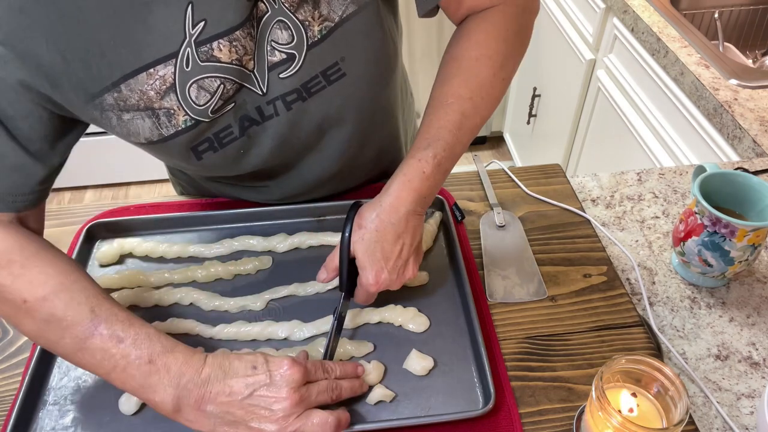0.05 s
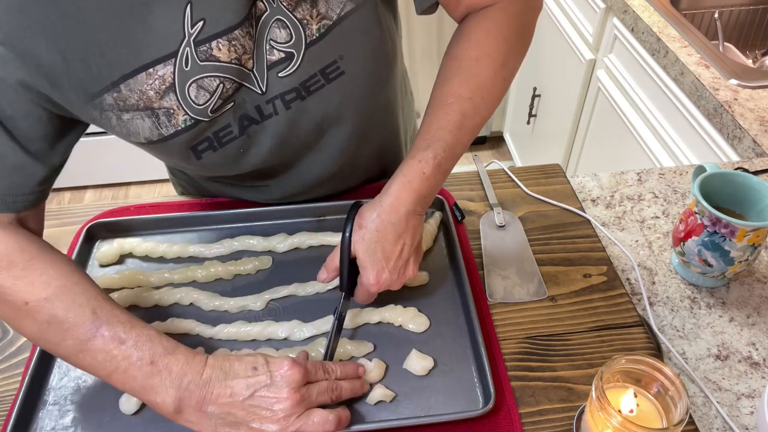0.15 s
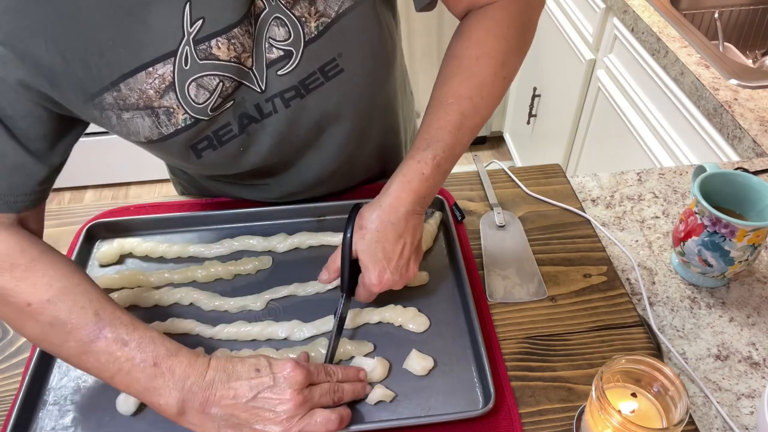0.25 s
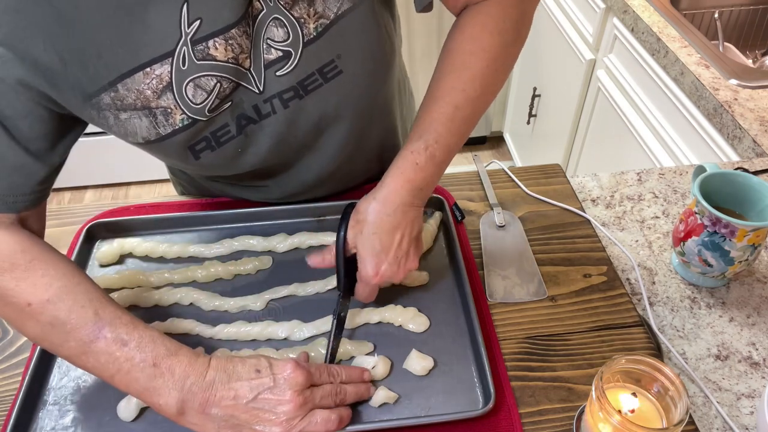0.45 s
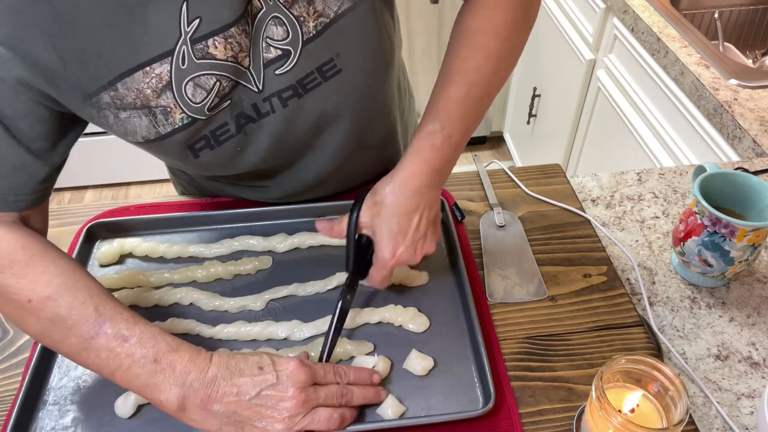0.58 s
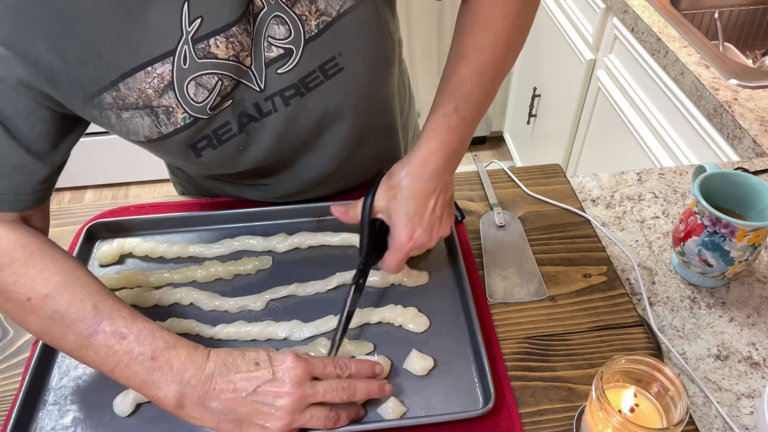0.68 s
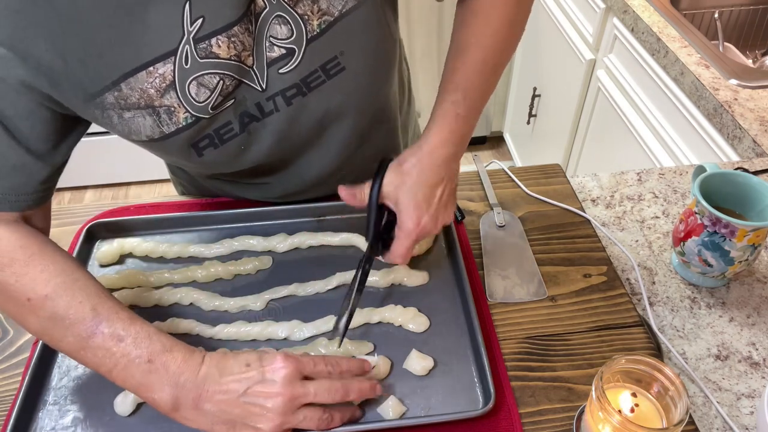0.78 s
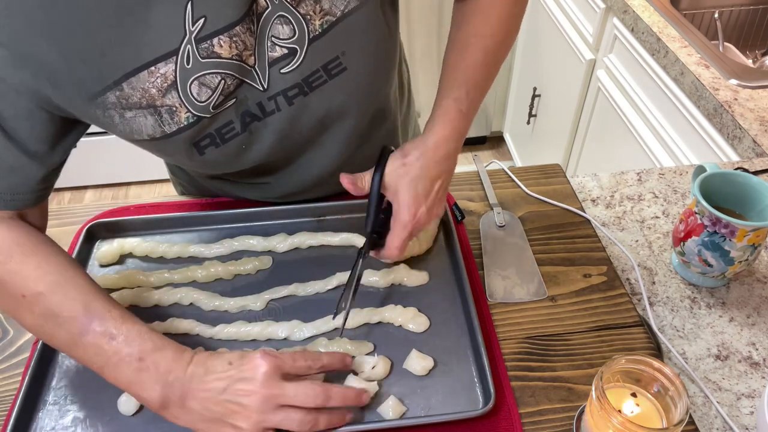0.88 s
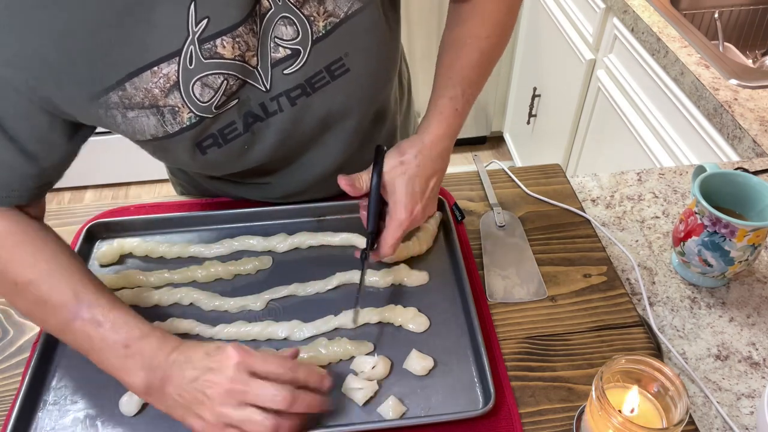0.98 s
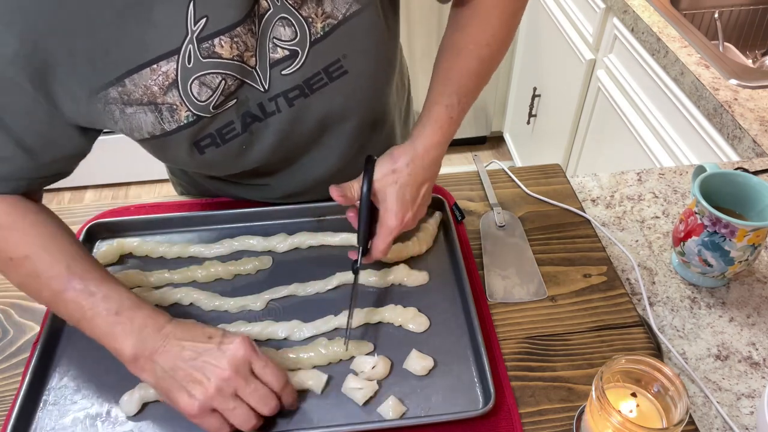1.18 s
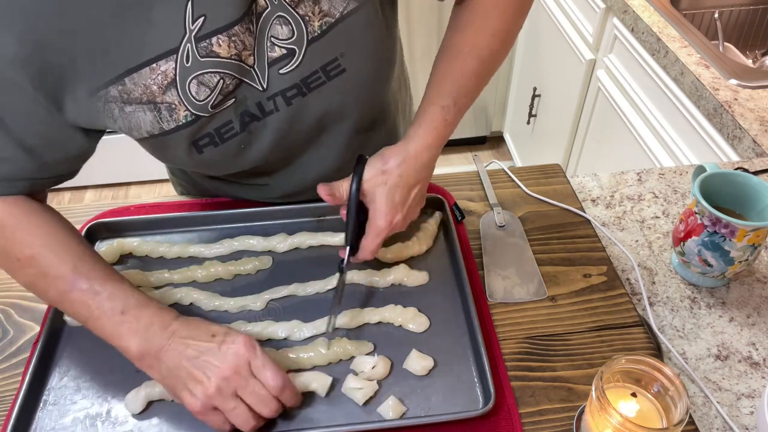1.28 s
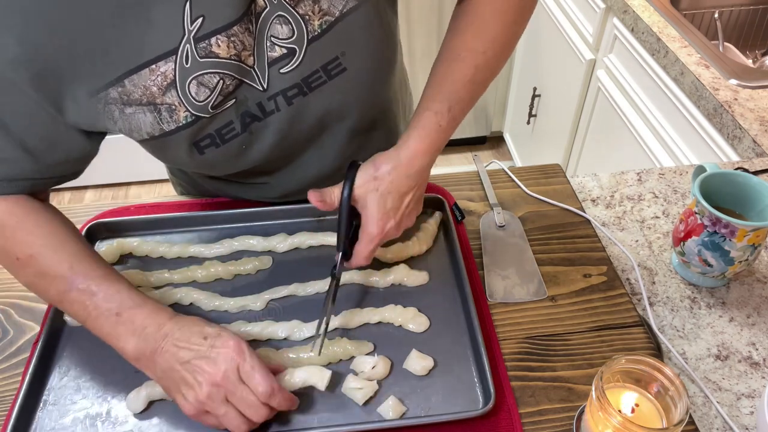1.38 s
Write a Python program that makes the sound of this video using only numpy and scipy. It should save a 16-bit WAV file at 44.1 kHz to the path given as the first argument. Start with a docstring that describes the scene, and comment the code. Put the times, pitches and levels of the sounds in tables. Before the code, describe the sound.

Scissors snap hard candy on a metal baking tray, one loud crack, then small clattering knocks

```python
"""In a kitchen, scissors bite through a rope of hard candy on a metal baking tray: a tick, then one loud snap.
Bursts of noise make the cracks and ring the sheet metal; smooth shoves make the tray thump.
The cut piece and the blades knock about, the blades slide open in tiny falling chirps and tick,
and a hand pats the tray and drags the rope along it as bands of noise.
Fading noise and two slow tones echo it all, over steady air noise and a faint hum of sines."""
import sys
import numpy as np
from scipy import signal
from scipy.fft import rfft, irfft
from scipy.io import wavfile
from scipy.ndimage import uniform_filter1d

SR = 44100
rng = np.random.default_rng(int(sys.argv[2]) if len(sys.argv) > 2 else 0)


def generate_wav(signal):
    """Clip the signal to [-1, 1] and save it as 16-bit WAV at the path in sys.argv[1]."""
    frames = np.transpose(np.atleast_2d(signal))
    scaled = np.clip(frames, -1, 1) * 32767
    pcm = np.round(scaled).astype(np.int16)
    wavfile.write(sys.argv[1], SR, pcm)


N = 63945  # length in samples


def undb(db):
    """Turn decibels into a plain factor."""
    return 10 ** (np.asarray(db) / 20)


def times():
    """Time of every sample in seconds."""
    return np.arange(N) / SR


def unit(x):
    """Scale to an average (RMS) level of 1."""
    return x / np.sqrt(np.mean(x ** 2))


def conv(x, response):
    """Let every sample of x set off the response."""
    return signal.fftconvolve(x, response)[:N]


def excite(x, response):
    """Set off a response that is first scaled to unit energy."""
    return conv(x, response / np.sqrt(np.sum(response ** 2)))


def along(points, hz):
    """Read (Hz, value) points on a log-frequency axis."""
    f, v = np.array(points).T
    return np.interp(np.log(np.maximum(hz, 1)), np.log(f), v)


def band(hz, width):
    """Noise passed twice through one resonance, for steep sides."""
    b, a = signal.iirpeak(hz, hz / width, fs=SR)
    once = signal.lfilter(b, a, rng.standard_normal(N))
    return signal.lfilter(b, a, once)


def ring(modes):
    """Sum of sines that each fall by 60 dB in their own time t60."""
    t = times()
    return sum(undb(db - 60 * t / t60) * np.sin(2 * np.pi * hz * t) for hz, db, t60 in modes)


def background():
    """Room air as steady coloured noise, and the hum of an appliance as steady sines."""
    # Each row: pitch in Hz, level in dB (RMS).
    hum_tones = [(59, -59), (170, -64.5), (340, -69.5)]
    # Colour of the air noise. Each row: frequency in Hz, relative level in dB.
    air_colour = [(40, -9.5), (60, 2), (116, -11.5), (170, -7.5), (230, -7.5), (350, -5.5), (520, -11),
                  (900, -21.5), (1400, -26), (2100, -36), (3700, -43), (14000, -49)]
    air_db = -54.5
    hum = 0
    for hz, db in hum_tones:
        hum = hum + undb(db) * np.sqrt(2) * np.sin(2 * np.pi * (hz * times() + rng.random()))
    spectrum = rfft(rng.standard_normal(N))
    air = irfft(spectrum * undb(along(air_colour, np.fft.rfftfreq(N, 1 / SR))), N)
    return hum + undb(air_db) * unit(air)


def colour(points, tilt_db=0):
    """Response of unit energy with the given spectrum, tilted in dB per octave above 1000 Hz."""
    hz = np.linspace(0, SR / 2, N + 1)
    level_db = along(points, hz) + tilt_db * np.log2(np.maximum(hz, 1000))
    # keeping only the first half of the cepstrum makes the response start at once
    cepstrum = irfft(np.log(undb(level_db)))[:N]
    cepstrum[0] = 0
    h = irfft(np.exp(rfft(2 * cepstrum, 2 * N)))[:N]
    return h / np.sqrt(np.sum(h ** 2))


def flatten(x):
    """Soften the chance peaks and dips in the spectrum of a short burst."""
    spectrum = rfft(x)
    power = uniform_filter1d(np.abs(spectrum) ** 2, size=41)
    return irfft(spectrum / np.abs(power + 1e-18) ** .3, len(x))


def crackle(start, rise, decay):
    """A swarm of tiny fractures, made of uneven noise that swells and dies away."""
    grain, decay_shape = .15, 1.3  # unevenness of the fractures, steepness of their decay
    t = times() - start
    env = np.clip(t / rise, 0, 1) * np.exp(-(np.maximum(t - rise, 0) / decay) ** decay_shape)
    fractures = rng.standard_normal(N) * np.exp(grain * rng.standard_normal(N))
    x = flatten(env * fractures)
    # flattening smears the burst in time, so trim it again
    x = x * (t > 0) * np.exp(-np.abs(t) / decay / 4)
    return x * np.sqrt(np.sum(env ** 2) / np.sum(x ** 2))


def push(start):
    """One smooth bell-shaped shove of unit area."""
    push_s = .0011
    x = np.exp(-2 * ((times() - start) / push_s * 2 - 1) ** 2)
    return x / x.sum()


def own_ring(hz):
    """A short, steep resonance of the struck piece: a brief ring set off by itself."""
    cycles = 9.6  # cycles in which the single ring falls by 60 dB
    h = ring([(hz, 0, cycles / hz)])
    return conv(h, h)


def candy():
    """Each break or knock cracks, rings the sheet metal and shoves the belly of the tray."""
    # The blades bite, the crack runs through, the blow lands on the tray.
    # Each row: start in seconds, rise in seconds, decay in seconds, ring in dB, crack in dB.
    snap_steps = [(0.223, 0.00073, .003, -12.5, -25), (0.224, .0028, 0.0048, -16, -5.5),
                  (0.2358, 0.00055, 0.0049, -11, -14.5)]
    # Knocks of candy and blades. Each row: start in seconds, decay in seconds, thud in dB, ring in dB,
    # crack in dB, treble tilt in dB per octave, own pitch in Hz, level of that pitch in dB.
    knocks = [(0.059, 0.0068, -61, -54, -70, -6, 2500, -66.5),
              (.113, 0.0029, -54, -52.5, -86, 15, 1340, -45),
              (0.185, 0.0054, -61, -41.5, -36, -1.5, 1400, -40.5),
              (0.2064, 0.0074, -75, -44, -40, 4, 1420, -63),
              (0.2789, 0.0066, -49, -28.5, -20, -2, 4050, -51),
              (0.2927, 0.0041, -32, -33.5, -19, -4, 2670, -18),
              (.460, 0.0033, -37.5, -34.5, -35, -16.5, 1200, -37),
              (0.4759, 0.0035, -35, -54, -37.5, -1.5, 1996, -40.5),
              (.5112, 0.0049, -42, -26.5, -26, 0, 4590, -33),
              (0.614, 0.0047, -57, -47, -42.5, -6.5, 1830, -52),
              (0.645, 0.0034, -70, -51, -47.5, 1, 1880, -49),
              (0.663, 0.0022, -38.5, -44, -65, -8, 1150, -29.5),
              (0.6788, .0036, -35.5, -27.5, -20, -3, 1166, -29.5),
              (0.7005, 0.0056, -39.5, -39.5, -29.5, -5, 2000, -78),
              (0.8936, 0.0022, -60, -43.5, -42, -5.5, 1280, -43.5),
              (0.9031, 0.0041, -30, -35.5, -27.5, -4, 1314, -25.5),
              (1.0947, 0.0053, -30.5, -40.5, -44, 1.5, 6020, -41.5),
              (1.1607, 0.0029, -65.5, -53, -54.5, -1, 1910, -48.5)]
    # The tray takes the force of the cut in two shoves. Each row: start in seconds, level in dB.
    thumps = [(0.2297, -17.5), (0.2342, -5)]
    # Colour of the cracks and knocks, with a dip from a nearby reflection.
    # Each row: frequency in Hz, relative level in dB.
    crack_colour = [(100, -28), (330, 1), (450, -1), (580, -2), (700, -2), (850, -6.5), (1050, -3.5),
                    (1400, 2), (2000, 3), (2700, 1), (4300, 2.5), (6500, -0.5), (9000, -7.5), (15500, -10)]
    # Low tones of the tray on its mat. Each row: pitch in Hz, level in dB, t60 in seconds.
    belly_modes = [(89.6, -21, 0.32), (189, -36, .06), (226.6, -8.5, 0.032), (251.1, -8, .12),
                   (341.2, -10.5, 0.19), (431.5, -10, 0.039), (550, -9, 0.047), (655.4, -13, 0.043),
                   (830, -12, .03)]
    # Tones of the sheet metal, damped by candy and mat.
    # Each row: pitch in Hz, relative level in dB, t60 in seconds.
    sheet_modes = [(1080, -9.5, 0.012), (1151, 0.5, 0.021), (1343, -1, 0.023), (1406, -4, 0.025),
                   (1703, -8.5, 0.015), (2024, -16, 0.024), (2650, -30.5, .025), (2830, -15.5, 0.061)]
    knock_rise_s, thud_lag_s = .0004, .00094
    belly_cut_hz = 118  # the tray radiates little below this
    sheet_band_hz = (803, 3280)  # the sheet metal radiates between these

    cracks, rattle = 0, 0
    force = sum(undb(db) * push(start) for start, db in thumps)
    for start, rise, decay, ring_db, crack_db in snap_steps:
        burst = crackle(start, rise, decay)
        cracks = cracks + undb(crack_db) * conv(burst, colour(crack_colour))
        rattle = rattle + undb(ring_db) * burst
    for start, decay, thud_db, ring_db, crack_db, tilt_db, own_hz, own_db in knocks:
        burst = crackle(start, knock_rise_s, decay)
        cracks = cracks + undb(crack_db) * conv(burst, colour(crack_colour, tilt_db))
        cracks = cracks + undb(own_db) * excite(burst, own_ring(own_hz))
        rattle = rattle + undb(ring_db) * burst
        force = force + undb(thud_db) * push(start + thud_lag_s)

    belly_filter = signal.butter(3, belly_cut_hz, "high", fs=SR, output="sos")
    belly = signal.sosfilt(belly_filter, conv(force, ring(belly_modes)))
    sheet_filter = signal.butter(3, sheet_band_hz, "band", fs=SR, output="sos")
    sheet = signal.sosfilt(sheet_filter, ring(sheet_modes))
    return cracks + excite(rattle, sheet) - belly


def kitchen():
    """Echo of the room: noise that fades at a different pace at each pitch, plus slow standing waves."""
    # Colour of the echo. Each row: frequency in Hz, relative level in dB.
    echo_colour = [(60, 0), (150, 3.5), (300, -5.5), (600, 3.5), (1200, -1.5), (2500, 1), (5000, -1.5),
                   (8000, 3), (15000, -4)]
    # How fast the echo fades. Each row: frequency in Hz, t60 in seconds.
    echo_t60 = [(100, 0.68), (300, 0.36), (1200, 0.58), (4000, 0.65), (8000, .5), (15000, .38)]
    # Standing waves. Each row: pitch in Hz, level in dB, t60 in seconds.
    standing_waves = [(245.1, -71.5, 0.54), (334, -69, 1)]
    tail_db, early_db, early_s = -44, -47.5, .045  # the early echoes die away quickly
    t, hz = times(), np.fft.rfftfreq(N, 1 / SR)
    noise = rfft(rng.standard_normal(N)) * undb(along(echo_colour, hz))
    early = undb(early_db) * np.exp(-t / early_s)
    centres = np.array(echo_t60)[:, 0]
    share = np.eye(len(echo_t60))  # overlapping bands that add up to the whole
    echo = 0
    for k, (_, t60) in enumerate(echo_t60):
        part = irfft(noise * along(list(zip(centres, share[k])), hz), N)
        late = undb(tail_db) * np.exp(-np.log(1000) * t / t60)
        echo = echo + part * (late + early)
    fade_in = np.clip((t - .001) / .002, 0, 1)  # from 1 to 3 ms
    return echo * fade_in + ring(standing_waves)


def blades():
    """Steel slides over steel in tiny falling chirps as the scissors open, and ticks in noise bursts."""
    # Light ticks of the blades. Each row: start in seconds, level in dB, centre in Hz.
    blade_ticks = [(.872, -66, 14000), (.880, -54, 14000), (.963, -58, 12000), (1.040, -49.5, 5900)]
    tick_s, tick_width_hz = .0028, 7300
    slide_s, spread_s, slide_db = .793, .016, -57  # middle of the slide, its spread, its peak level
    slide_hz, fall_hz_per_s, scatter_hz = 11500, 70000, 1520
    catches_per_s, fade_per_s = 1500, 550  # how often steel catches, how fast each catch fades
    t = times() - slide_s
    catches = rng.standard_normal(N) * (rng.random(N) < catches_per_s / SR)
    grit = conv(catches, np.exp(-times() * fade_per_s))
    wander = unit(uniform_filter1d(rng.standard_normal(N), size=120))
    pitch = slide_hz - fall_hz_per_s * np.clip(t, -.05, .05) + scatter_hz * wander
    chirps = unit(grit * np.cos(2 * np.pi * np.cumsum(pitch) / SR))
    out = undb(slide_db) * chirps * np.exp(-.5 * (t / spread_s) ** 2)
    for start, db, hz in blade_ticks:
        age = times() - start
        fade = (age > 0) * np.exp(-np.abs(age) / tick_s)
        out = out + undb(db) * unit(band(hz, tick_width_hz)) * fade
    return out


def stutter(depth_db):
    """Quick uneven level changes of sticking and slipping."""
    return depth_db * unit(uniform_filter1d(rng.standard_normal(N), size=300))


def rubbing(bands):
    """Noise in several resonances, mixed to an average level of 1."""
    return unit(sum(undb(db) * unit(band(hz, width)) for hz, width, db in bands))


def hand():
    """A soft pat rings one low tone, then the rope stutters along the tray; its first tug also hisses."""
    # Level of the drag. Each row: time in seconds, level in dB.
    drag_level = [(1.158, -70), (1.164, -54), (1.213, -54), (1.245, -62), (1.308, -60), (1.37, -62.5),
                  (1.45, -71)]
    # Resonances of the drag. Each row: centre in Hz, width in Hz, relative level in dB.
    drag_bands = [(1170, 540, -7.5), (1964, 280, -1), (3730, 1670, -8)]
    # Resonances of the hissing tug. Each row: centre in Hz, width in Hz, relative level in dB.
    tug_bands = [(1870, 1600, 2), (4620, 600, -0.5), (5370, 2900, -1)]
    pat_s, pat_hz, pat_db, pat_t60_s = 1.104, 91.2, -30, .039
    tug_s, tug_hold_s, tug_release_s, tug_db = 1.152, .055, .03, -56.5
    pat = conv(push(pat_s), ring([(pat_hz, pat_db, pat_t60_s)]))
    at, db = np.array(drag_level).T
    rub = rubbing(drag_bands) * undb(np.interp(times(), at, db, left=-150))
    age = times() - tug_s
    tug = undb(tug_db) * (age > 0) * np.exp(-np.maximum(age - tug_hold_s, 0) / tug_release_s)
    hiss = rubbing(tug_bands) * tug
    return pat + (rub + hiss) * undb(stutter(1.1))


def scene():
    """Candy, blades and hand, heard directly and through the kitchen, over the background."""
    direct = candy() + blades() + hand()
    return (direct + conv(direct, kitchen()) + background())[None]


def record(dry):
    """The recorder drops the deep bass, rounds the loudest peaks and cuts the top."""
    low_cut_hz, top_hz = 65, 16000
    bass_filter = signal.butter(4, low_cut_hz, "high", fs=SR, output="sos")
    rounded = np.tanh(signal.sosfilt(bass_filter, dry))
    top_filter = signal.ellip(8, .2, 80, top_hz, fs=SR, output="sos")
    return signal.sosfilt(top_filter, rounded)


dry = scene()
out = record(dry)
generate_wav(out)
```